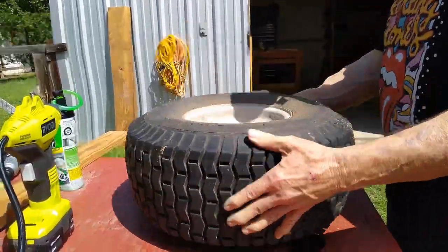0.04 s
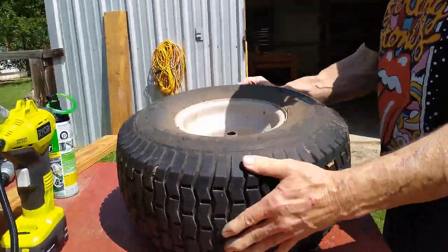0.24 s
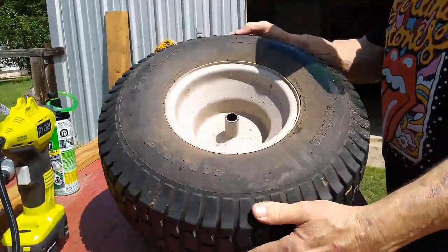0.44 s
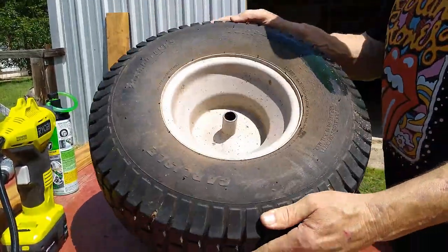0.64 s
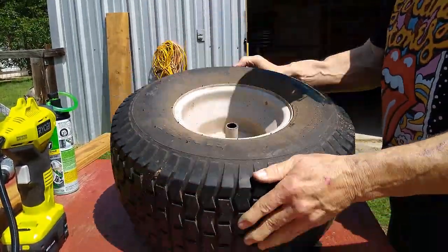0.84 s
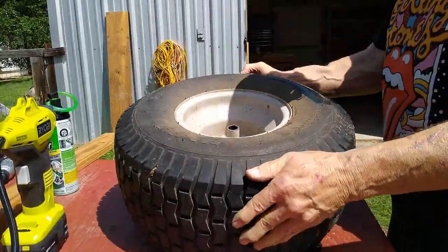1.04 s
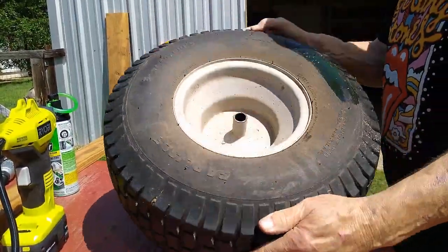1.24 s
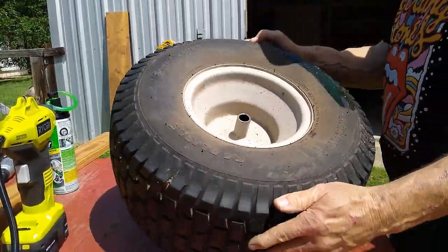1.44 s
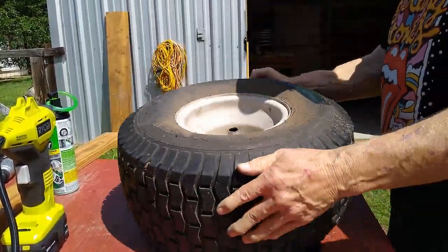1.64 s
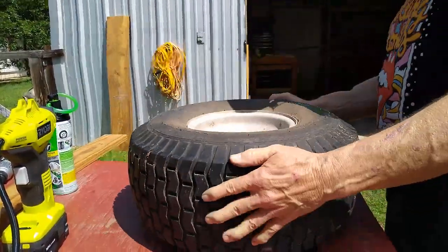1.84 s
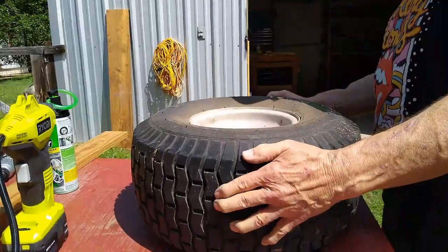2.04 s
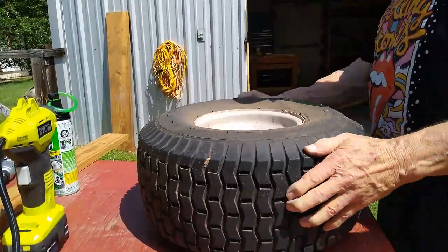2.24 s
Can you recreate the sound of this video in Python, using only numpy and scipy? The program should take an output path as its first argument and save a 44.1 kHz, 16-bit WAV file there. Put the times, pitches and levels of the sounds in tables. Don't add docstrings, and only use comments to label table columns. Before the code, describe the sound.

Dull, booming tire thuds on wooden planks with knocks and rattle, over a faint distant engine hum

```python
import sys
import numpy as np
from scipy import signal
from scipy.fft import rfft, irfft
from scipy.io import wavfile
from scipy.ndimage import uniform_filter1d

SR = 44100
rng = np.random.default_rng(int(sys.argv[2]) if len(sys.argv) > 2 else 0)


def inscribe(sig):
    pcm = np.round(np.clip(np.atleast_2d(sig).T, -1, 1) * 32767)
    wavfile.write(sys.argv[1], SR, pcm.astype(np.int16))


def gain_from_db(level_db):
    decades = np.asarray(level_db, float) / 20
    return 10 ** decades


N = 101430
T = np.arange(N) / SR
FLICKER_DB = 1.2


def curve(rows, col=1):
    rows = np.array(rows)
    return np.interp(T, rows[:, 0], rows[:, col])


def colour(x, points):
    hz, db = np.transpose(points)
    bins = np.maximum(np.arange(N // 2 + 1) * SR / N, 1)
    gain = gain_from_db(np.interp(np.log(bins), np.log(hz), db, left=-80))
    y = irfft(rfft(x) * gain, N)
    return y / np.sqrt(np.mean(y ** 2))


def pair(likeness):
    noise = rng.standard_normal((3, N))
    return np.sqrt(likeness) * noise[0] + np.sqrt(1 - likeness) * noise[1:]


def walk(rate):
    hold = int(SR / rate)
    steps = np.repeat(rng.standard_normal(N // hold + 1), hold)
    return 1.3 * uniform_filter1d(uniform_filter1d(steps, hold), hold)[:N]


def ring(x, hz, t60):
    pole = np.exp(2j * np.pi * hz / SR - np.log(1000) / (t60 * SR))
    return signal.lfilter([1], [1, -pole], x).imag


def pan(db):
    return gain_from_db(np.array([[db], [-db]]) / 2)


def butter(x, order, hz, kind):
    return signal.sosfilt(signal.butter(order, hz, kind, fs=SR, output="sos"), x)


# frequency in [Hz], density in [dB per Hz].
YARD_TONE = [(120, -30), (200, 1.5), (420, 2.5), (800, -9), (2000, -15.5), (11800, -38), (12600, -42),
             (13200, -66)]


def yard():
    return colour(pair(0.83), YARD_TONE) * gain_from_db(-65 + FLICKER_DB * walk(6.6))


# time in [s], firing rate in [Hz], its level in [dB], level of its double in [dB].
FAR_ENGINE = [(0, 103.3, -59, -66), (.5, 103.3, -50, -77), (.65, 102.4, -49.5, -85),
              (.82, 95.96, -47.5, -59), (.88, 89.4, -48, -59.5), (.97, 82.3, -58.5, -61),
              (1.1, 81.97, -61, -55), (1.2, 80.03, -43.5, -68), (1.4, 84.1, -46, -69),
              (1.6, 89.7, -51, -63), (2.3, 90.35, -51.5, -91)]


def engine():
    firing_hz = curve(FAR_ENGINE) * (1 + 0.0053 * walk(14.6))
    phase = 2 * np.pi * np.cumsum(firing_hz) / SR
    first = gain_from_db(curve(FAR_ENGINE, col=2) + 1.2 * walk(12.0)) * np.sin(phase)
    second = gain_from_db(curve(FAR_ENGINE, col=3) + 1.2 * walk(9.4)) * np.sin(2 * phase)
    return np.sqrt(2) * (first + second) * pan(1)


# time in [s], level in [dB].
BREEZE_LEVEL = [(0, -41.5), (.1, -44), (.27, -37), (.4, -44), (.7, -54.5), (.9, -43), (1.0, -60),
                (1.16, -47.5), (1.34, -40.5), (1.7, -39.5), (1.85, -52), (2.0, -33), (2.2, -52), (2.3, -38)]
# frequency in [Hz], density in [dB per Hz].
BREEZE_TONE = [(25, -16), (45, 3.5), (70, 6.5), (110, -3.5), (170, -8.5), (260, -25.5), (500, -53.5)]
# start in [s], level in [dB], swirl rate in [Hz].
PRESSES = [(1.204, -27, 165), (1.2167, -12.5, 219), (1.222, -15.5, 101), (1.2356, -17, 170),
           (1.245, -25, 200), (1.254, -20, 86.5), (1.2685, -13.5, 137), (1.2764, -14, 93),
           (1.292, -13.5, 93), (1.303, -19, 59.4), (1.428, -33, 149.4)]
# start in [s], level in [dB], swirl rate in [Hz].
SUCTIONS = [
    (1.231, -20.5, 154),
    (1.263, -19, 130),
    (1.273, -14, 159),
    (1.2195, -19, 182),
]


def wind():
    out = colour(pair(0.65), BREEZE_TONE) * gain_from_db(curve(BREEZE_LEVEL) + 2 * FLICKER_DB * walk(20)) * pan(2.1)
    for way, swirls in ((1, PRESSES), (-1, SUCTIONS)):
        for s, db, hz in swirls:
            turns = np.maximum((T - s) * hz, 0)
            swell = (1 - np.exp(-(turns / 0.44) ** 2)) * np.exp(-(turns / 0.81) ** 2)
            out[0] += way * gain_from_db(db) * np.sin(2 * np.pi * (turns - .15)) * swell * 2
    return out


# time in [s], level in [dB].
SLIDE_LEVEL = [(0, -67.5), (.11, -51.5), (.27, -72), (.3, -70), (.43, -68.5), (.5, -62), (.6, -64.5),
               (.72, -71), (.9, -63.5), (1.0, -66.5), (1.45, -75), (1.7, -62.5), (1.85, -64), (1.88, -52.5),
               (1.98, -61), (2.09, -68.5), (2.13, -54.5), (2.3, -46.5)]
# frequency in [Hz], density in [dB per Hz].
RUB_TONE = [(900, -6.5), (2200, -6.5), (4700, -8.5), (8000, -9.5), (11500, -5.5), (12600, -7),
            (15500, -9.5)]
# time in [s], level in [dB], centre in [Hz], length in [s].
SMALL_SCUFFS = [
    (0.57, -65, 6300, 0.01),
    (.757, -67, 5470, 0.0024),
    (1.042, -69, 9430, 0.0029),
    (1.121, -60, 3108, 0.0033),
    (1.146, -65, 3240, 0.0035),
    (1.151, -66, 9800, 0.0035),
    (1.81, -60.5, 11570, 0.0033),
    (0.774, -61, 758, 0.016),
    (1.221, -66.5, 3887, 0.0039),
    (1.274, -68.5, 3820, 0.008),
]


def sliding():
    level_db, rub = curve(SLIDE_LEVEL), colour(pair(0.063), RUB_TONE)
    air_hz, full_air_db, air_slope = 12500, -61, 2.2
    low, air = butter(rub, 8, air_hz, "low"), butter(rub, 8, air_hz, "high")
    hiss = low + air * gain_from_db(air_slope * np.minimum(level_db - full_air_db, 0))
    out = hiss * gain_from_db(level_db + FLICKER_DB * walk(41.88)) * pan(2)
    for s, db, hz, length in SMALL_SCUFFS:
        band = butter(pair(.6), 2, [hz * .9, hz * 1.1], "band")
        out += band / band.std() * gain_from_db(db) * np.exp(-.5 * ((T - s) / length) ** 2)
    return out


# start in [s], level in [dB], ring in [Hz], length in [s].
SOFT_TAPS = [(0.116, -39, 920, 0.0072), (.142, -25.5, 1790, 0.0019), (0.151, -32, 1490, 0.0038),
             (.177, -21, 541, .009), (0.18, -26.5, 900, 0.0045), (.214, -26, 700, 0.0028),
             (.215, -36.5, 1800, .012), (.128, -33, 1700, .012), (.168, -39, 1500, .01),
             (.249, -40, 6000, .004), (.224, -39, 3300, 0.0023), (.311, -43, 800, 0.0069),
             (.314, -38.5, 340, 0.013), (0.332, -45, 500, .008), (0.379, -38, 450, .004),
             (.373, -40, 750, .004), (.408, -46.5, 583, 0.0067), (0.427, -55, 794, 0.0075),
             (0.439, -53.5, 860, .01), (0.465, -52, 600, 0.005), (.733, -57, 395, 0.0085),
             (.858, -53, 320, 0.0074), (.865, -59, 895, 0.0074), (1.039, -56.5, 368, 0.0071),
             (1.084, -62, 2500, 0.0036), (1.098, -56, 367, 0.007), (1.103, -59, 2100, 0.0044),
             (1.12, -57, 1880, 0.0053), (1.146, -55.5, 437, 0.0073), (1.195, -65, 2000, .004),
             (1.428, -51, 260.8, .01), (1.521, -51, 230, 0.012), (1.575, -50, 232, .01),
             (1.611, -55, 302, 0.0085), (1.88, -39, 860, 0.0037), (1.913, -42, 5520, .004),
             (2.054, -45, 850, .008), (1.968, -42.5, 2720, .01), (1.957, -40, 3800, .007),
             (1.845, -50, 180, .015), (.428, -48, 280, .012), (1.35, -46, 175, .015),
             (2.005, -42.5, 620, 0.0094), (2.03, -40.5, 209, 0.011), (2.195, -50.5, 611, 0.0096),
             (2.23, -44, 257, 0.0096), (2.232, -47, 1050, 0.0071)]


def taps():
    gritty_hz, grit_width, rise = 1200, 1.3, 0.5
    out, grit = np.zeros((2, N)), pair(.4)
    waver = 0.6 * np.array([walk(250), walk(250)])
    for s, db, hz, length in SOFT_TAPS:
        near = slice(max(int(s * SR) - 400, 0), int((s + 3 * length) * SR))
        t = T[near] - s
        u = np.maximum(t, 0) / length
        if hz > gritty_hz:
            note = butter(grit[:, near], 2, [hz / grit_width, hz * grit_width], "band")
            note = note / note.std()
        else:
            note = 2 * np.sin(2 * np.pi * hz * t + waver[:, near])
        out[:, near] += gain_from_db(db) * note * (1 - np.exp(-u / rise)) * np.exp(-u ** 2)
    return out * pan(6)


# start in [s], level in [dB], length in [s].
RIM_SLAPS = [
    (.1422, -4, 0.0013),
    (.2503, -14, 0.00096),
    (0.13, -28.5, 0.00035),
]


def cracks():
    out = np.zeros(N)
    for (s, db, length), way in zip(RIM_SLAPS, (1, -1, 1)):
        u = (T - s) / length
        out += way * gain_from_db(db) * np.where((u > 0) & (u < 1), np.sin(np.pi * u) ** 2, 0)
    return out * pan(2)


# start in [s], level in [dB], tick level in [dB], contact pitch in [Hz].
PLANK_KNOCKS = [(0.126, -23, -38, 2020), (.128, -23, -56, 540), (0.137, -21, -52, 330),
                (.1405, -30, -31, 420), (0.1505, -19, -34, 560), (0.179, -30, -43, 520),
                (.196, -27.5, -66, 730), (.214, -26.5, -53, 1300), (.229, -27, -40.5, 666),
                (0.2363, -16.5, -31.5, 600), (0.266, -26.5, -37, 292), (.274, -27, -73, 645),
                (0.31, -36.5, -75, 400), (.375, -43, -83, 990), (.858, -52, -57.5, 686),
                (1.297, -54, -57, 667), (1.88, -37.5, -62, 505), (1.894, -27.5, -58, 255),
                (1.907, -27, -42, 438), (1.916, -26, -48, 560), (1.935, -25, -44, 600),
                (1.964, -24.5, -52, 309.6), (1.969, -25, -42, 600), (2.054, -38.5, -84, 650),
                (2.147, -45.5, -71, 691)]
# start in [s], level in [dB], tick level in [dB], contact pitch in [Hz].
SPRING_BACKS = [
    (.374, -34.5, -50.5, 445),
    (1.9558, -16.5, -29, 570),
    (1.974, -18, -41, 585),
    (.2502, -24, -30.5, 527),
]
# frequency in [Hz], level in [dB], t60 in [s].
LEFT_MODES = [(236.6, 2.5, 0.048), (356.4, 1, 0.063), (445.6, -11, 0.072), (517, -1.5, 0.036),
              (600, -2.5, 0.041), (754, -3, 0.033), (956, 1, 0.018), (1288, -14, 0.052), (1830, -12, 0.015),
              (1530, -15.5, 0.017), (2270, -10, 0.007)]
# frequency in [Hz], level in [dB], t60 in [s].
RIGHT_MODES = [(200, 11.5, 0.029), (308, 8.5, 0.027), (520, -7.5, 0.1), (768, -3.5, 0.051), (848, 7, 0.037),
               (1106, 4, 0.026), (1496, 4, 0.0084), (2125, 7.5, 0.0038), (2900, -7, 0.0031)]
# frequency in [Hz], density in [dB per Hz].
TICK_TONE = [(1000, 17), (2000, 8), (4200, 1.5), (5900, 5.5), (6700, -1), (12000, 0.5), (15500, 0)]
# time in [s], rattle level in [dB].
ROLLING_LOAD = [(0, -89), (.11, -50), (.13, -24.5), (.2, -32.5), (.28, -35), (.3, -47.5), (.44, -56.5),
                (.56, -62.5), (.72, -89), (.78, -59.5), (.95, -67), (1.5, -63.5), (1.86, -55.5), (1.9, -35),
                (1.985, -35), (2.0, -54), (2.1, -54.5), (2.3, -42)]


def plank_ring(x, modes):
    return sum(gain_from_db(db) * ring(x, hz, t60) for hz, db, t60 in modes)


def planks():
    load_db, contact_cycles = curve(ROLLING_LOAD), 2.36
    push = np.zeros(N)
    ticks = gain_from_db(load_db - 18 + 3.2 * walk(150))
    for way, contacts in ((1, PLANK_KNOCKS), (-1, SPRING_BACKS)):
        for s, db, tick_db, hz in contacts:
            u = (T - s) * hz
            force = np.sin(2 * np.pi * u) * np.cos(np.pi * u / contact_cycles / 2)
            touching = (u > 0) & (u < contact_cycles)
            push += way * gain_from_db(db - 8.5) * hz / SR * 4 * np.where(touching, force, 0)
            ticks += gain_from_db(tick_db + 1) * (T > s) * np.exp(-np.abs(T - s) / 0.002)

    hits = (rng.random((2, N)) < 1600 / SR) * gain_from_db(2 * rng.exponential(size=(2, N)))
    hits = hits * np.sign(rng.standard_normal((2, N)))
    out = []
    for k, modes in enumerate((LEFT_MODES, RIGHT_MODES)):
        unit = plank_ring(hits[k], modes).std()
        rattle = hits[k] / unit * gain_from_db(load_db) * pan(3)[k]
        out.append(plank_ring(push * pan(9.5)[k] + rattle, modes))
    return np.array(out) + ticks * pan(4.5) * colour(pair(0.093), TICK_TONE)


# start in [s], level in [dB], boom in [Hz], direction of push in [+1 or -1].
LANDINGS = [(0.126, -9.5, 102.8, 1), (.132, -7.5, 77.8, -1), (0.217, -17, 70, 1), (.228, -17, 95, 1),
            (0.2327, -6, 68.1, -1), (1.892, -24, 77, 1), (1.899, -19.5, 68, -1), (1.922, -25, 59.4, 1),
            (1.947, -10, 72.6, -1), (2.06, -35, 60.1, 1), (2.108, -33, 80, 1), (0.053, -28, 63.6, 1)]


def booms():
    push_s, swing_cycles = 0.002, 1.77
    out = np.zeros(N)
    for s, db, hz, way in LANDINGS:
        t = np.maximum(T - s, 0)
        swell = (1 - np.exp(-t / push_s)) * np.exp(-(t * hz / swing_cycles) ** 2)
        out += np.sign(way) * gain_from_db(db) * np.sin(2 * np.pi * hz * t) * swell
    return out * pan(2.5)


def scene():
    around = yard() + engine() + wind()
    return around + sliding() + taps() + cracks() + planks() + booms()


def band_limit(x):
    return signal.sosfilt(signal.butter(12, 16460, fs=SR, output="sos"), x)


def record(dry):
    bass_cut = signal.butter(2, 33, "high", fs=SR, output="sos")
    top_cut = signal.ellip(8, .2, 60, 15700, fs=SR, output="sos")
    mix = signal.sosfilt(top_cut, signal.sosfiltfilt(bass_cut, dry))
    return band_limit(mix)


dry = scene()
out = record(dry)
inscribe(out)
```